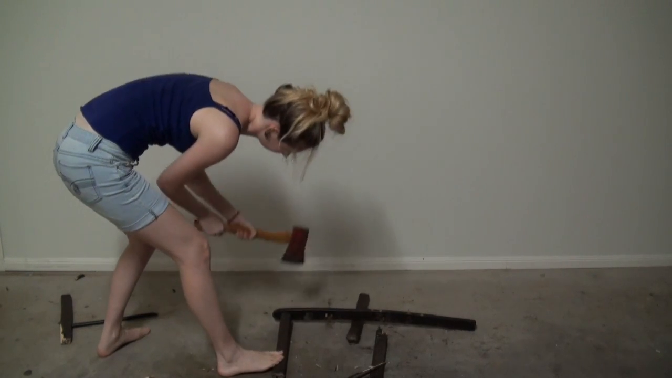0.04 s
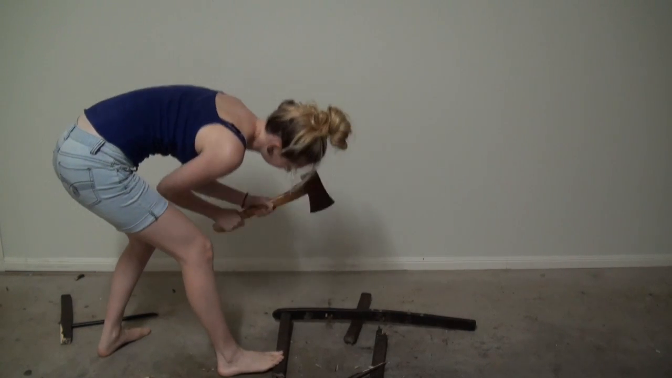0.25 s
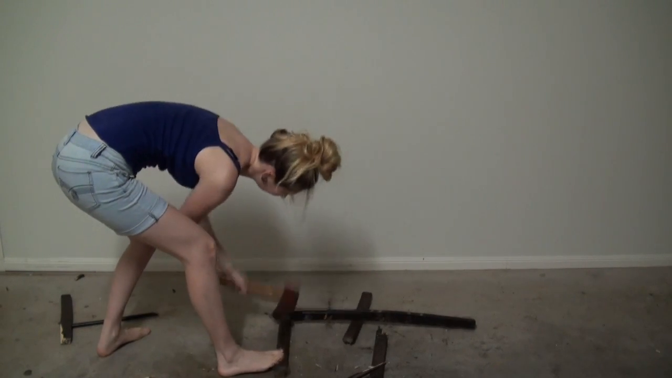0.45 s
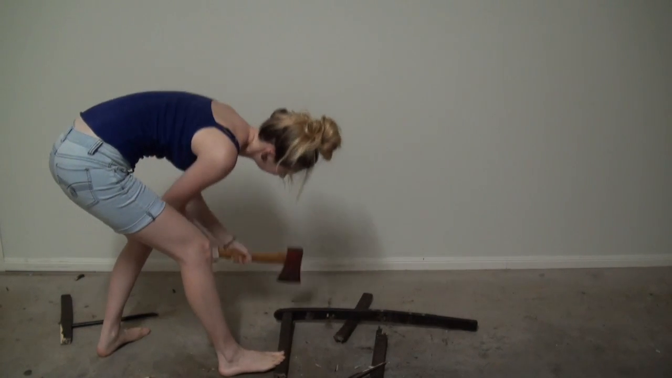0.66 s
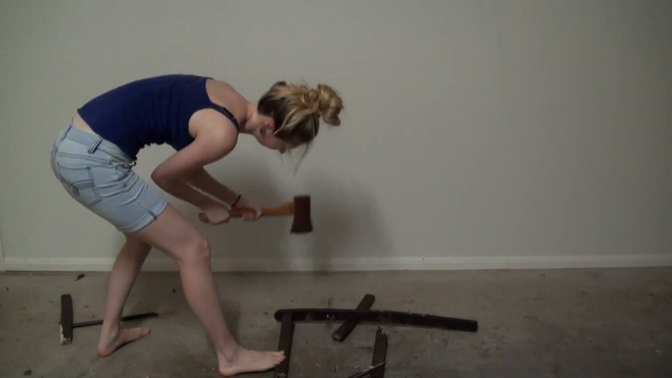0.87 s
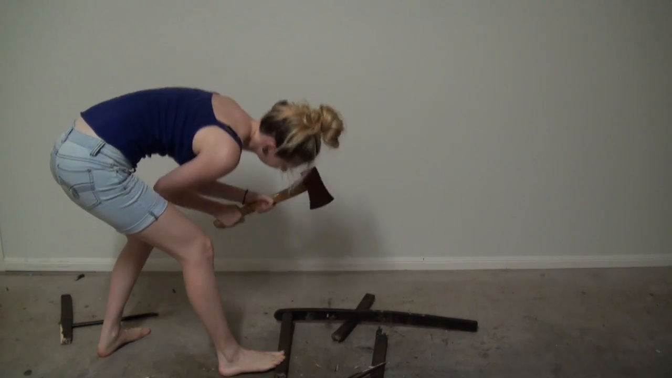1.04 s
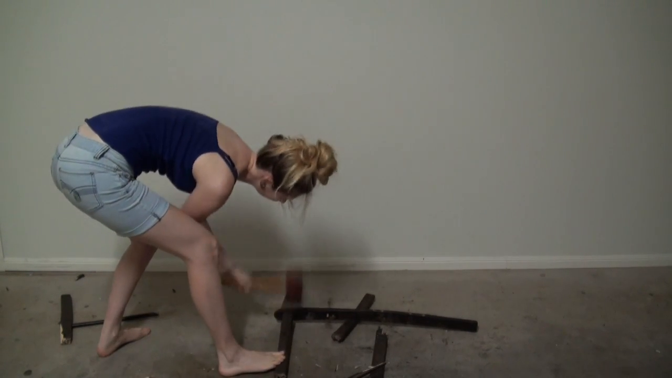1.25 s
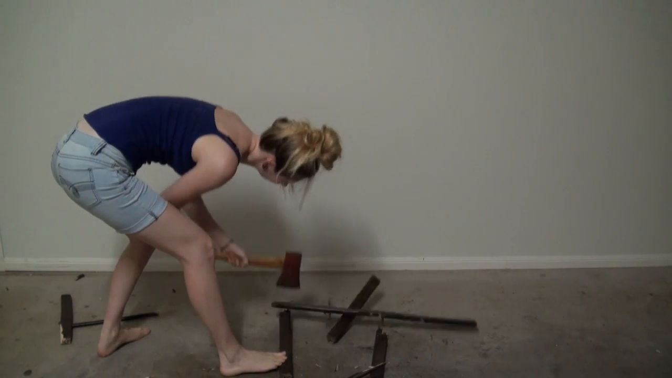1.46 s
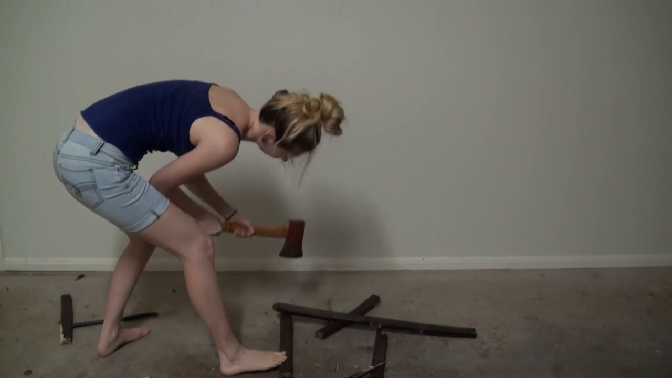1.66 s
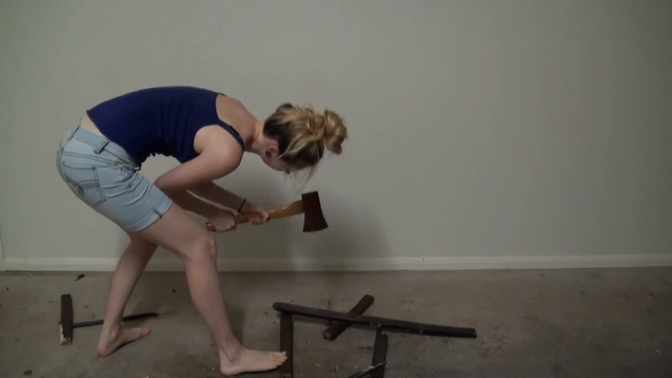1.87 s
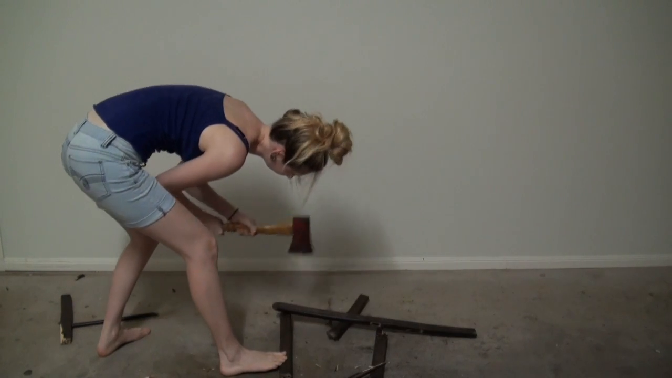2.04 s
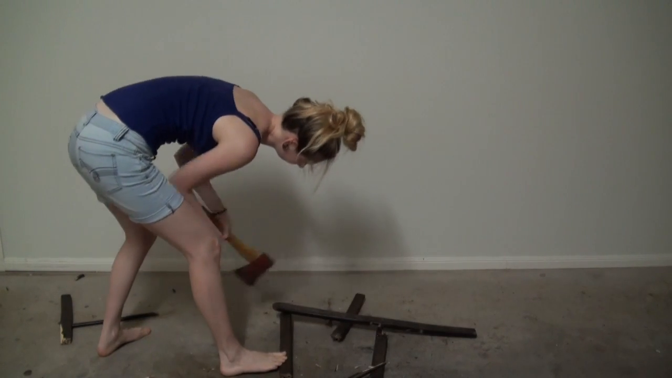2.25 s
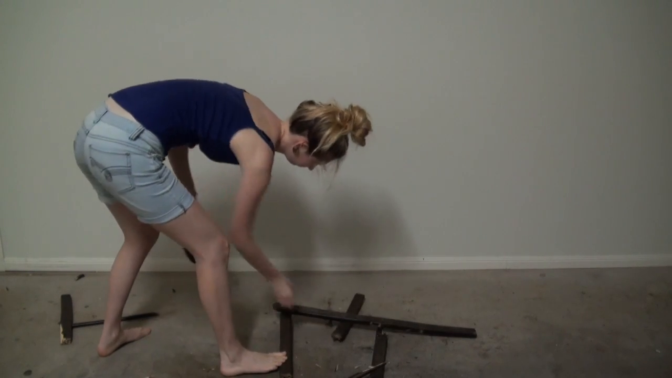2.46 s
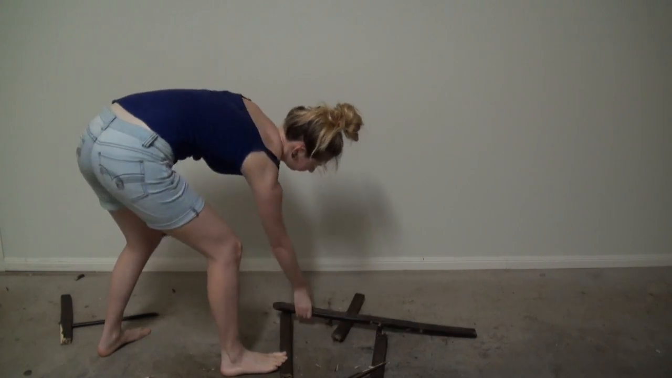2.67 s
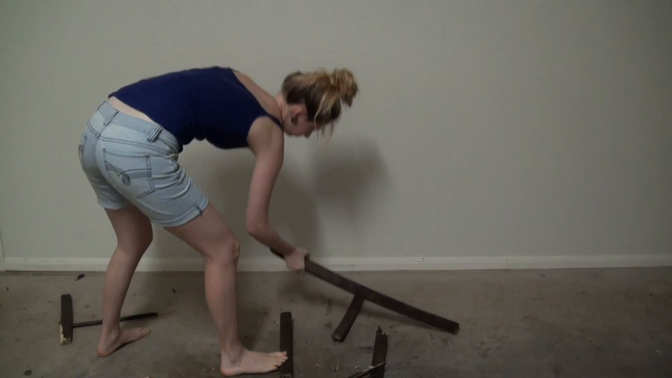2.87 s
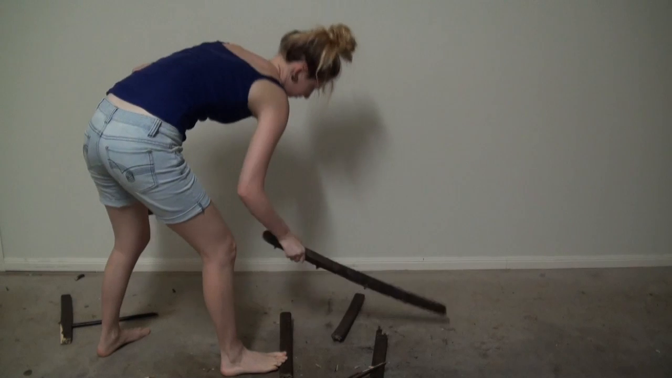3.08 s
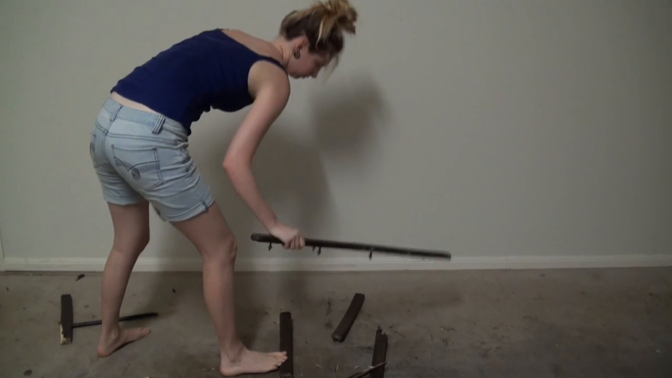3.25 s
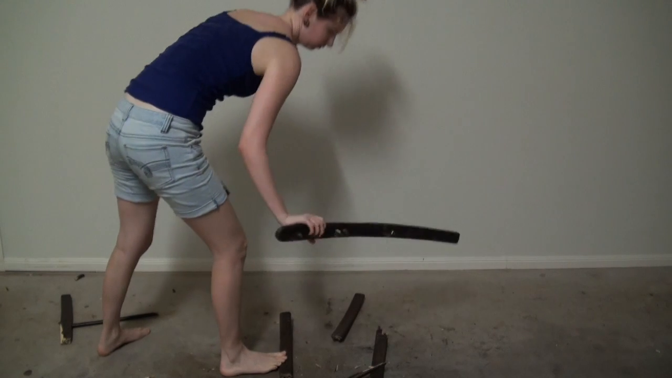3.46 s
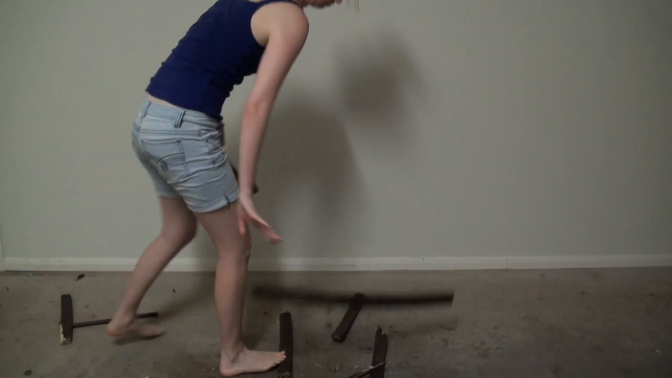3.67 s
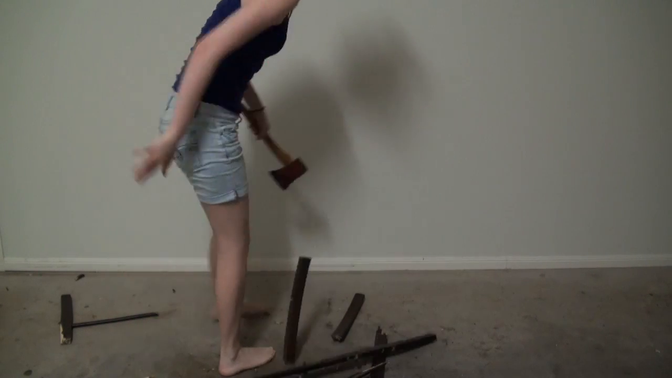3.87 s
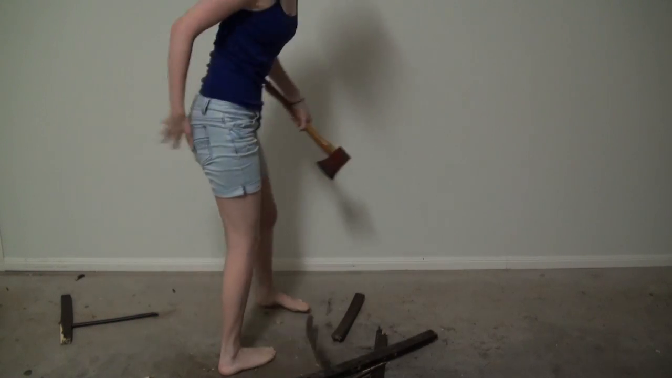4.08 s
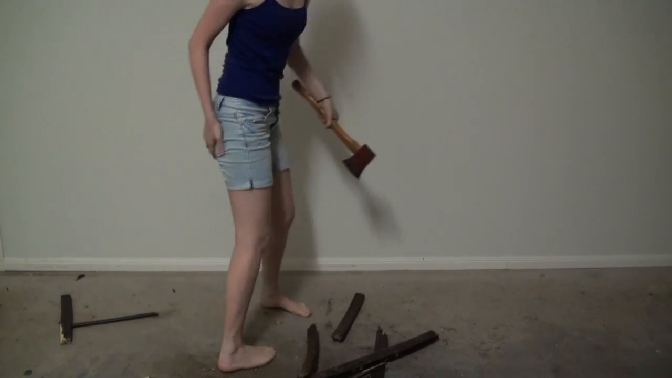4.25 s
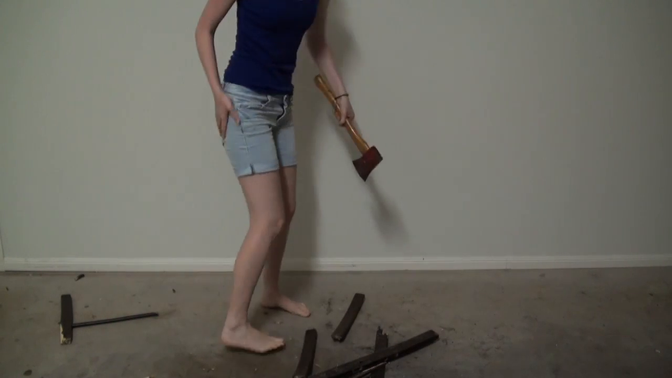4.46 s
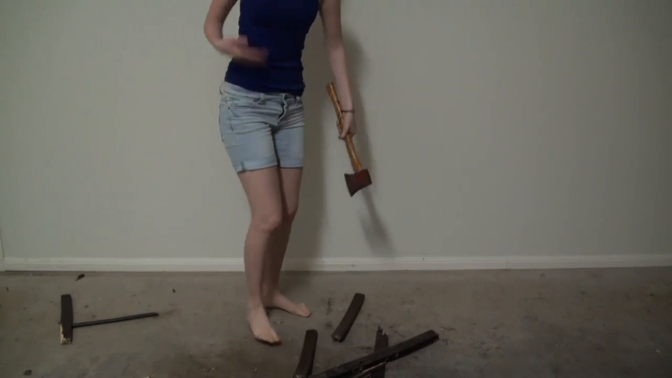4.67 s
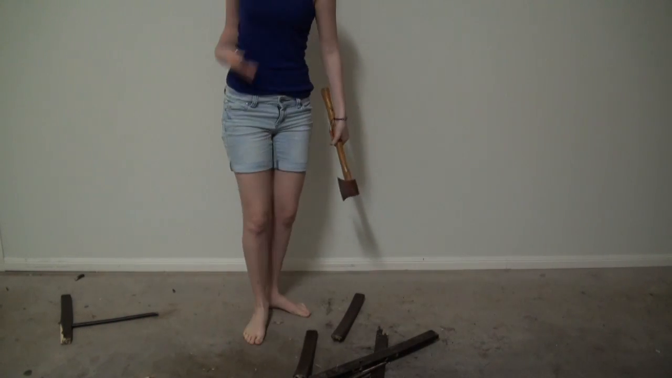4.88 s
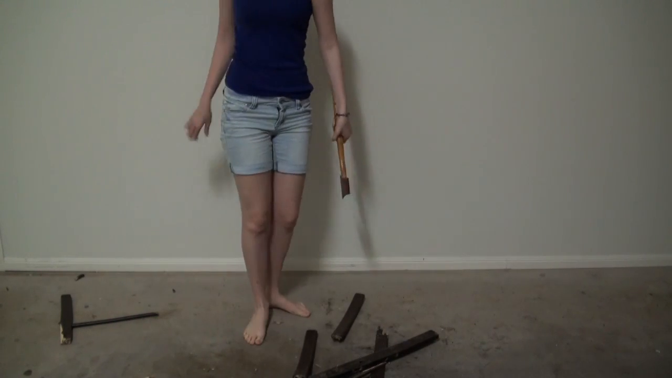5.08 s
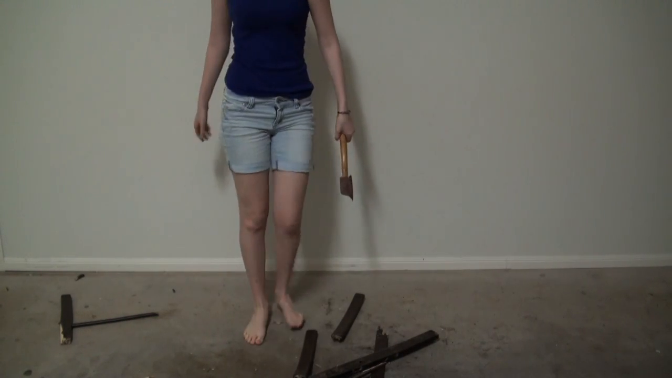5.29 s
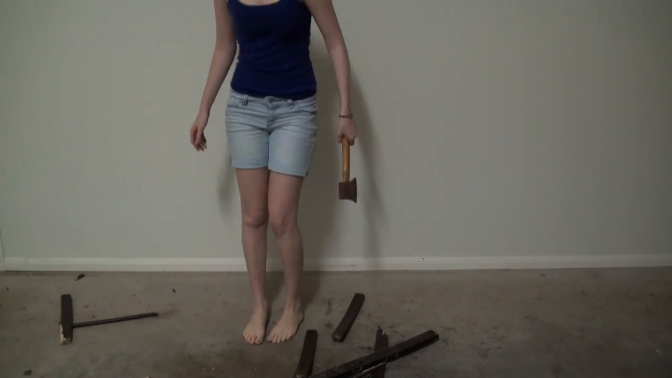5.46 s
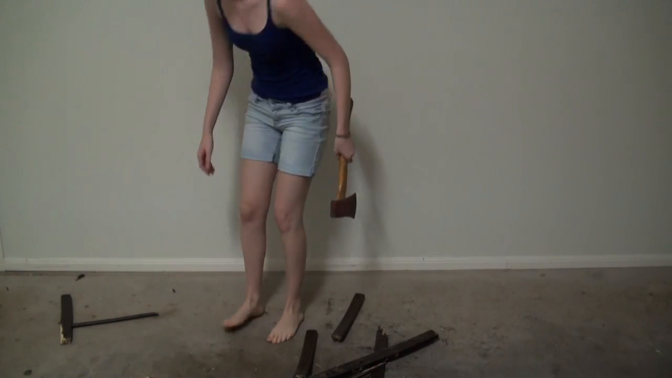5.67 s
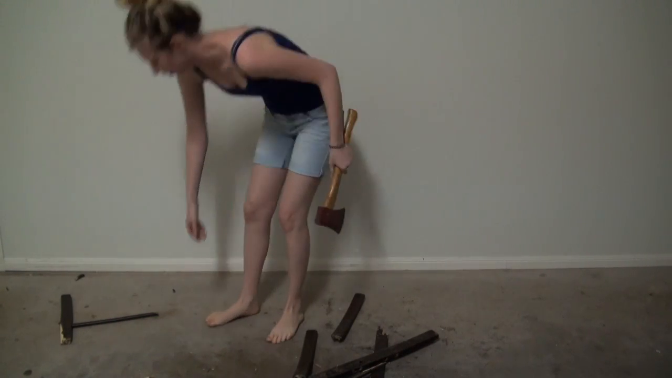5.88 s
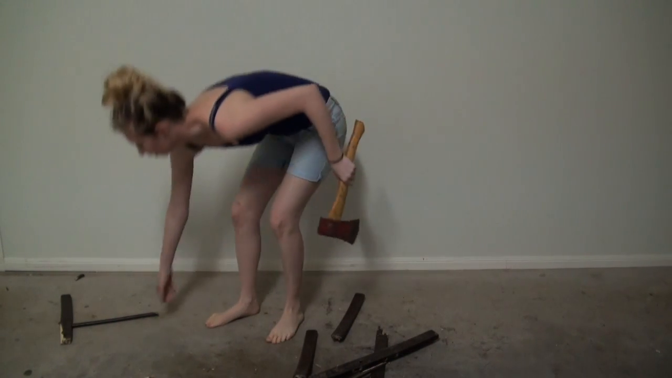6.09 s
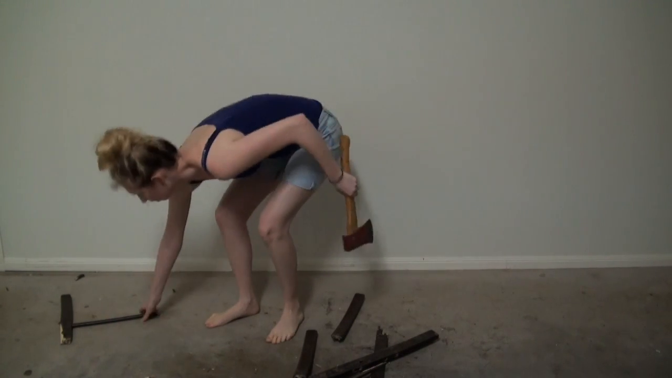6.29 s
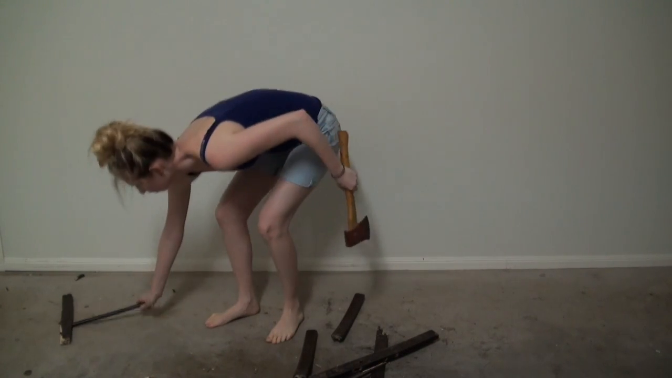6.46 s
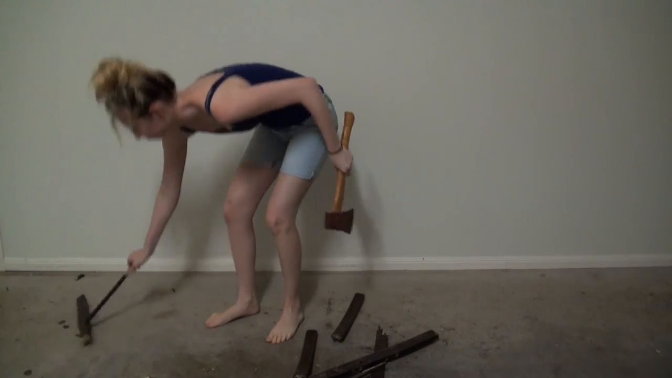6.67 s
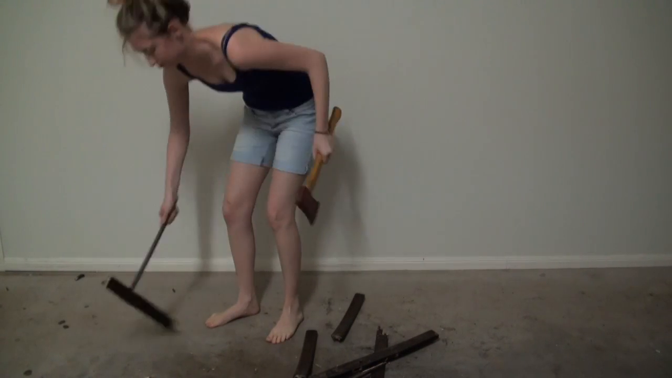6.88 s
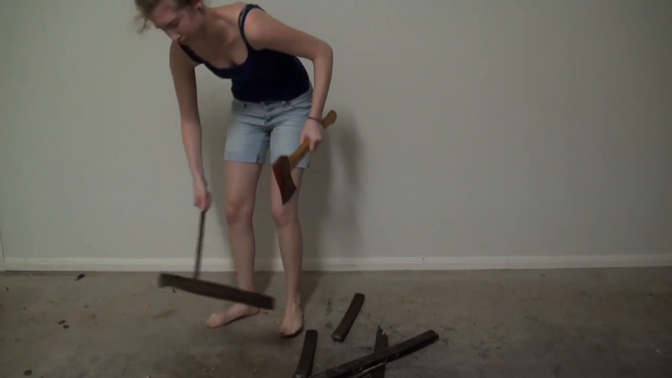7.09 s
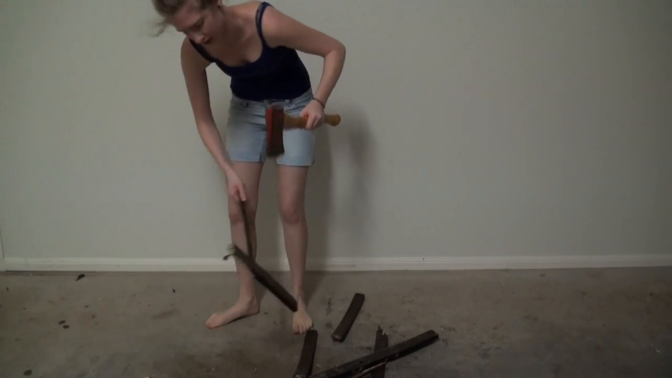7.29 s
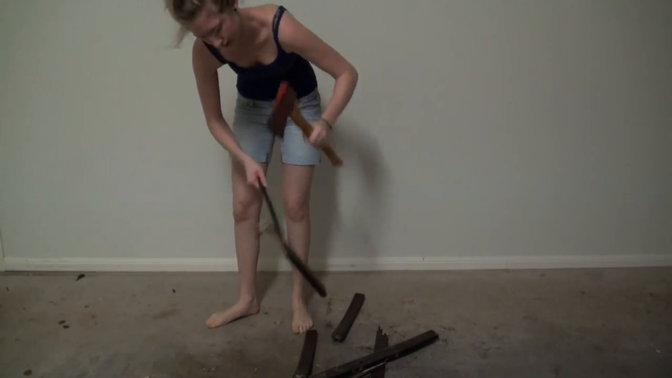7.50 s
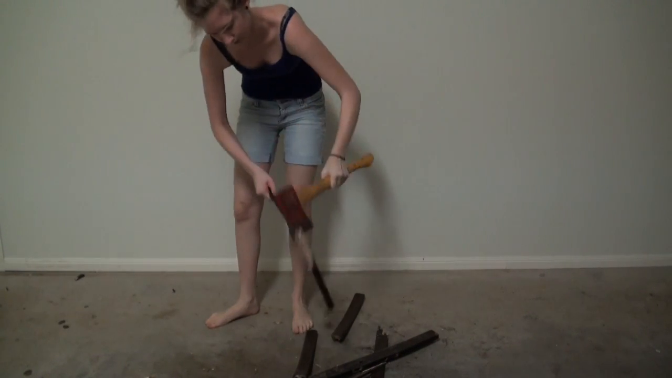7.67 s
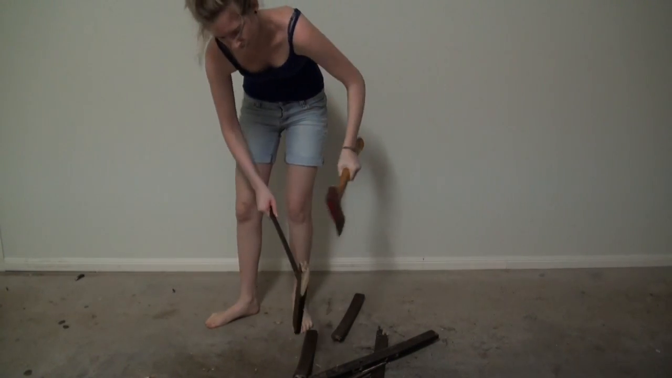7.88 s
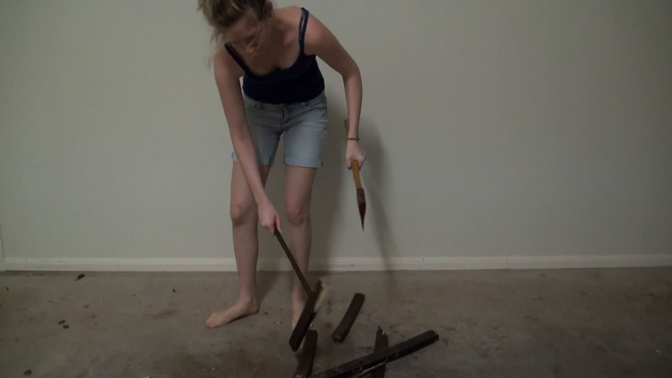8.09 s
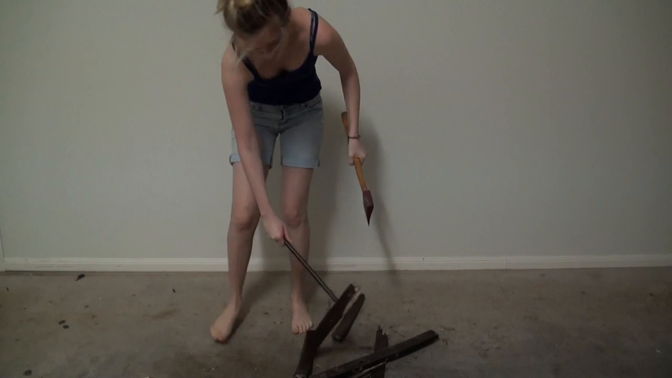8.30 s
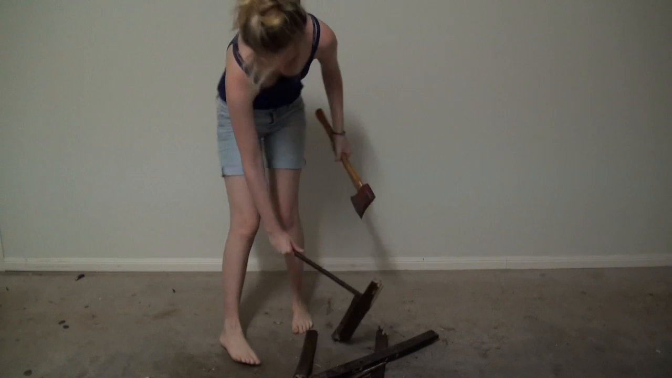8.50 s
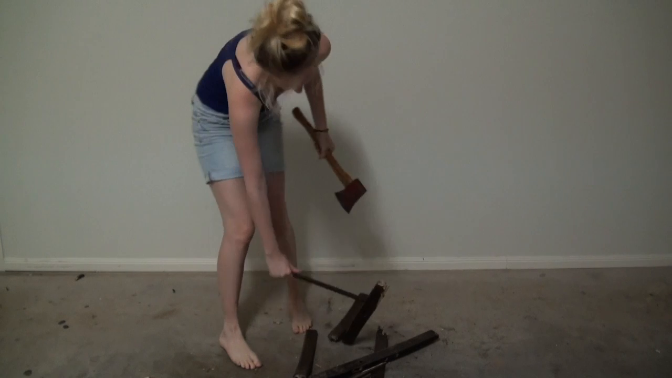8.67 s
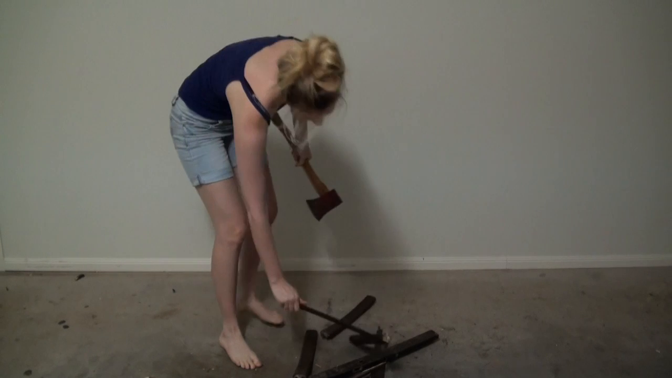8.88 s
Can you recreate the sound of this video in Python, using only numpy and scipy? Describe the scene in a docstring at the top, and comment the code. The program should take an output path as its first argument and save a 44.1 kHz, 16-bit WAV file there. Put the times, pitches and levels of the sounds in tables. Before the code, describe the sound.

Two loud echoing hatchet chops split wooden chair parts, then a thrown rail clatters on concrete, followed by dragging, one weaker chop and dull knocks.

```python
"""In a bare, ringing room with a concrete floor, a hatchet chops a wooden chair apart.
A loose rail is picked up and thrown down, clatters and rocks to rest; a leg is dragged up, struck and set down.
Blows are noise bursts ringing tuned wood with a room echo, over low thuds; drags and brushes are uneven noise.
Grit ticks underfoot; faint hiss and a deep rumble of filtered noise rise and sink together.
A compressor squashes each blow, and its gain recovers through the echo."""
import sys
import numpy as np
from scipy import signal
from scipy.fft import rfft, irfft
from scipy.io import wavfile
from scipy.ndimage import uniform_filter1d

SR = 44100
rng = np.random.default_rng(int(sys.argv[2]) if len(sys.argv) > 2 else 0)


def to_wav(sig):
    """Store sig (one row per channel, or 1-D mono) as 16-bit WAV at the path in sys.argv[1].

    Samples outside -1..1 are clipped; the rate is SR.
    """
    pcm = np.clip(np.atleast_2d(sig), -1, 1) * 32767
    pcm = np.round(pcm).astype(np.int16)
    wavfile.write(sys.argv[1], SR, pcm.T)  # frames by channels


N = 394254

# chops into the frame and into the loose leg: (time [s], bite level [dB], bite brightness [dB per octave],
# bite mode [Hz], split level [dB], lift of the split's mode [dB], freedom to ring [0-2], weight on the floor [dB])
FRAME_CHOPS = [(-.2, 7.5, 0.2, 1665, 5.5, 10, .15, -15), (.557, -3, 1.63, 1097, 7, 7, 0.54, -11),
               (1.371, 0, -0.84, 1464, 2.5, 4, 0.82, -8.5)]
LEG_CHOPS = [(7.686, -10.5, 0.0054, 1340, -6.5, 12, 0.14, -26)]
# the thrown rail hits the floor: (time [s], level [dB], brightness [dB per octave], favoured mode [Hz],
# its lift [dB], weight on the floor [dB])
LANDINGS = [(3.831, -9, 2, 1175, 16, -19.5), (3.861, -8.5, -2, 1427, -3.5, -26),
            (3.871, -4.5, 5.5, 4830, 11.5, -29), (3.907, -2.5, 0.9, 1950, 6, -37.5),
            (4.067, -6, .6, 3400, 3, -45), (4.251, 1, 0.35, 2522, 13, -24)]
# blunt knocks as the leg is set down: (time [s], level [dB], favoured mode [Hz], its lift [dB],
# weight on the floor [dB])
SET_DOWNS = [(8.395, -37.5, 685, 13, -45), (8.673, -36, 1300, -8, -39), (8.722, -27.5, 1350, 3, -15)]
# colour of the leg: (frequency [Hz], relative level [dB])
LEG_COLOUR = [(40, -24), (150, -16.5), (300, -5.5), (480, -2), (800, -5.5), (1500, 0), (2800, -3),
              (4500, -6.5), (6500, -12), (8700, -24), (13000, -18.5), (16000, -28)]
# resonances of the leg, and of the room: (frequency [Hz], width [Hz], lift [dB])
LEG_MODES = [(594, 100, 5.6), (1423, 85, 7.7), (2592, 150, 8.9), (3740, 330, 4.9), (5280, 130, 7.2),
             (7950, 200, 1.1)]
ROOM_MODES = [(157.7, 6.9, 14.1), (270, 13, 5.5), (384, 8.3, 4.6), (403, 30, 0.76), (6100, 610, 5),
              (7840, 570, 7.3), (9530, 200, 7.3), (11500, 510, 2.9)]
# colour of grit and rubbed surfaces: (frequency [Hz], relative level [dB])
SAND_COLOUR = [(100, -18), (600, 0), (2000, 5), (5000, -2.5), (9000, -6.5), (16000, -14.5)]


def amp(db):
    """Decibels to an amplitude factor."""
    return 10 ** (np.asarray(db) / 20)


def unit(x):
    """Scale a signal to an RMS of 1."""
    return x / np.sqrt(np.mean(x ** 2) + 1e-20)


def along(points, hz):
    """Read (frequency, value) points on a log frequency axis."""
    f, v = np.transpose(points)
    return np.interp(np.log(hz + 1), np.log(f), v)


def curve(rows):
    """Join (time, value) rows into one value per sample."""
    return np.interp(np.arange(N) / SR, *np.transpose(rows))


def add(track, s, sound):
    """Mix a sound into the track from s seconds; a negative start leaves only its later part."""
    start = round(s * SR)
    part = sound[max(-start, 0):N - start]
    track[max(start, 0):][:len(part)] += part


def body(colour, modes=(), bright=0, ripple_db=0, size=4096):
    """Causal impulse response of energy 1: a tilted colour, its resonances, and a ripple of many minor modes."""
    hz = np.fft.rfftfreq(size, 1 / SR)
    db = along(colour, hz) + bright * np.log2(np.maximum(hz, 300))
    ripple = unit(uniform_filter1d(rng.standard_normal(len(hz)), size=6))
    db = db + ripple_db * ripple
    for centre, width, lift in modes:
        db = db + lift / (1 + (2 * (hz - centre) / width) ** 2)
    # fold the cepstrum forward in time: minimum phase, so the attack comes first
    cepstrum = irfft(np.log(amp(db)))
    cepstrum[1:size // 2] *= 2
    cepstrum[size // 2 + 1:] = 0
    response = irfft(np.exp(rfft(cepstrum)))
    return response / np.linalg.norm(response)


def echo(build_s=0.0097):
    """A fresh room tail: reflections pile up, then the air makes the treble die first."""
    # decay time of the room: (frequency [Hz], time to fall 60 dB [s])
    room_t60 = [(100, .9), (400, 1.15), (1200, 1.28), (2700, 1.24), (4500, 1.05), (7500, .88), (11000, .66),
                (16000, .45)]
    noise = rng.standard_normal(round(1.7 * SR))
    hz, t, z = signal.stft(noise, SR, nperseg=256)
    decay = amp(-60 * t / along(room_t60, hz)[:, None])
    build = 1 - np.exp(-t / build_s)
    return signal.istft(z * decay * build, SR, nperseg=256)[1]


def strike(response, crack_t60, room_db, snap_db, direct_db=4):
    """A short crunch of contact and its echo ring the struck body; the bare snap of fibres arrives directly."""
    tail = echo()
    t = np.arange(len(tail)) / SR
    crack = rng.standard_normal(len(t)) * amp(-60 * t / crack_t60)
    excitation = amp(direct_db) * crack + amp(room_db) * tail
    rung = signal.fftconvolve(excitation, response)
    return rung[:len(t)] + amp(snap_db) * crack


def wood(hits, colour, modes, favour_width, crack_t60, room_db, snap_db, ripple_db):
    """Blows on one piece: a pinned piece rings less, and the point of contact favours one mode."""
    track = np.zeros(N)
    for s, db, bright, hz, lift_db, freedom in hits:
        ringing = [(centre, width, freedom * lift) for centre, width, lift in modes]
        favoured = [(hz, favour_width * hz, lift_db)]
        response = body(colour, ringing + ROOM_MODES + favoured, bright, ripple_db)
        # harder, brighter contacts snap more
        blow = strike(response, crack_t60, room_db, snap_db + 0.93 * bright)
        add(track, s, amp(db) * blow)
    return track


def chop(rows, split_s, split_hz, split_bright):
    """Two contacts per chop: the edge bites, and a moment later the wood splits with a brighter sound."""
    bite_lift_db = 8.5  # how much the edge favours its mode
    hits = []
    for s, bite_db, bright, bite_hz, split_db, lift_db, freedom, _ in rows:
        hits.append((s, bite_db, bright, bite_hz, bite_lift_db, freedom))
        hits.append((s + split_s, split_db, bright + split_bright, split_hz, lift_db, freedom))
    return hits


def clatter(bright, count):
    """The rail lands end over end, then rocks to rest on one mode, each bounce sooner and weaker."""
    landing_freedom, rock_freedom = 0.9, 1.1
    rock_db, rock_loss_db = -9, 23  # first bounce, and loss per bounce
    rock_hz, rock_lift_db = 2533, 18
    flight_s, shrink = 0.21, 0.63  # first flight, and the factor for each next one
    hits = []
    for s, db, tilt, hz, lift_db, _ in LANDINGS:
        hits.append((s, db, tilt, hz, lift_db, landing_freedom))
    s = 4.31
    for k in range(count):
        hits.append((s, rock_db - k * rock_loss_db, bright, rock_hz, rock_lift_db, rock_freedom))
        s += flight_s * shrink ** k
    return hits


def taps(rows, lift_db, rebound_s, rebound_db):
    """Light contacts on a loose piece; each chatters once more, a little weaker."""
    hits = []
    for s, db, bright, hz, freedom in rows:
        hits.append((s, db, bright, hz, lift_db, freedom))
        hits.append((s + rebound_s, db + rebound_db, bright, hz, lift_db, freedom))
    return hits


def set_down(bright, freedom):
    """Dull knocks of the leg, damped by the hand that holds it."""
    return [(s, db, bright, hz, lift_db, freedom) for s, db, hz, lift_db, _ in SET_DOWNS]


def frame_and_rail():
    """The frame's modes ring under the hatchet, in the loose rail, and in one flying splinter."""
    # colour of the frame: (frequency [Hz], relative level [dB])
    frame_colour = [(40, -39.5), (110, -33.5), (152, -22), (200, -30), (300, -21), (600, -8.5),
                    (1000, -6.5), (1700, 2.5), (2800, -2.5), (4500, -5), (6000, -14), (8500, -25.5),
                    (12000, -26.5), (16000, -36.5)]
    # resonances of the frame: (frequency [Hz], width [Hz], lift at freedom 1 [dB])
    frame_modes = [(634, 100, 10), (930, 120, 8.5), (1204.4, 45, 12.5), (1386, 88, 7.5), (1820, 72, 10.5),
                   (2403, 160, 11), (2910, 270, 11), (3447, 100, 8), (4430, 440, 4), (4320, 95, 1),
                   (4900, 110, 1)]
    # taps as the rail is jogged or lifted: (time [s], level [dB], brightness [dB per octave],
    # favoured mode [Hz], freedom to ring [0-2])
    rail_taps = [(2.72, -50.5, 1.5, 3600, 1.4), (2.783, -44, 1.8, 1910, 1.4), (2.907, -37, 4.5, 2300, 0.94),
                 (3.041, -42, 0.5, 3510, 1.3), (3.407, -59, 6, 6360, 0.39)]
    # a splinter from the third chop lands: (time [s], level [dB], brightness [dB per octave],
    # favoured mode [Hz], its lift [dB], freedom to ring [0-2])
    splinter = [(1.63, -16.5, 1.5, 4330, 8, 1.8)]
    hits = (chop(FRAME_CHOPS, split_s=.008, split_hz=3005, split_bright=0.21)
            + taps(rail_taps, lift_db=6.5, rebound_s=0.027, rebound_db=-5)
            + clatter(bright=1.2, count=3) + splinter)
    return wood(hits, frame_colour, frame_modes, favour_width=0.12,
                crack_t60=0.044, room_db=-3.5, snap_db=-23, ripple_db=2.5)


def loose_leg():
    """The leg rings in its own modes as it is jogged, struck and set down."""
    # taps as the leg is jogged or lifted: (time [s], level [dB], brightness [dB per octave],
    # favoured mode [Hz], freedom to ring [0-2])
    leg_taps = [(6.3, -48.5, 1.6, 2800, 0.94), (6.427, -38.5, 2.2, 3800, 0.97),
                (6.534, -32.5, 5.4, 3780, 1.7), (6.636, -28, 3.6, 5200, 1.8), (6.668, -27.5, 1.3, 4040, 2),
                (6.748, -18.5, 0.58, 2610, 1.94), (8.796, -28.5, 5.2, 2770, 1.74)]
    hits = (chop(LEG_CHOPS, split_s=.0035, split_hz=2600, split_bright=0.96)
            + taps(leg_taps, lift_db=8.5, rebound_s=.033, rebound_db=-9.0)
            + set_down(bright=-3.5, freedom=0.42))
    return wood(hits, LEG_COLOUR, LEG_MODES, favour_width=0.16,
                crack_t60=0.047, room_db=-2.5, snap_db=-44, ripple_db=2.5)


def thud(hz, t60):
    """One low sine that starts at once and dies away."""
    t = np.arange(SR) / SR
    return np.sin(2 * np.pi * hz * t) * amp(-60 * t / t60)


def bumps(events, bright, boom_db, push_db, room_db):
    """The weight of each blow on the floor: a soft push, its echo, and a boom near the room's lowest mode."""
    # colour of the push: (frequency [Hz], relative level [dB])
    bump_colour = [(40, -40), (130, -15), (280, -4), (520, -5), (800, -12), (1500, -40), (5000, -55.5),
                   (16000, -58)]
    track = np.zeros(N)
    for s, *_, weight_db in events:
        contact = amp(room_db) * echo()
        contact[0] += amp(push_db)
        push = signal.fftconvolve(contact, body(bump_colour, ROOM_MODES, bright))
        add(track, s, amp(weight_db) * push)
        add(track, s, amp(weight_db + boom_db) * thud(hz=155, t60=0.33))
    return track


def floor_weight():
    """Chops, landings and knocks press on the concrete, each kind with its own balance of push and boom."""
    return (bumps(FRAME_CHOPS + LEG_CHOPS, bright=0.77, boom_db=-5, push_db=22.5, room_db=-13)
            + bumps(LANDINGS, bright=-1, boom_db=-9, push_db=20, room_db=-9)
            + bumps(SET_DOWNS, bright=1, boom_db=-13.5, push_db=24.5, room_db=-9.5))


def low_thumps():
    """Brief low thumps at 45 Hz are heard with the heaviest contacts."""
    # (time [s], level [dB])
    thumps = [(.559, -15), (.635, -18), (1.373, -24), (3.862, -23), (4.251, -23)]
    track = np.zeros(N)
    for s, db in thumps:
        add(track, s, amp(db) * thud(hz=45, t60=0.099))
    return track


def strokes(rows, attack_s, release_s):
    """Force of rubbing strokes: each swells up to its start, holds, and dies away after its length."""
    t = np.arange(N) / SR
    force = np.zeros(N)
    for s, length, db in rows:
        before = np.maximum(s - t, 0) / attack_s
        after = np.maximum(t - s - length, 0) / release_s
        force += amp(db - 20 * (before + after))  # 20 dB per attack or release time
    return force


def rub(force, response, grain_db, direct_db):
    """Friction: uneven tiny slips excite a body and fill the room."""
    # each slip lasts 128 samples, about 3 ms
    slips = np.repeat(np.minimum(rng.standard_normal(N // 128 + 1), 1.8), 128)[:N]
    friction = unit(rng.standard_normal(N) * amp(grain_db * slips)) * force
    path = echo()
    path /= np.linalg.norm(path)
    path[0] += amp(direct_db)
    return signal.fftconvolve(friction, signal.fftconvolve(path, response))[:N]


def drag(leg_db=-1, sand_db=-6):
    """The leg dragged over concrete hums in its own modes while the grit under it hisses."""
    # (start of full force [s], length [s], force [dB])
    drag_strokes = [(6.6, 0.16, -32.5), (6.99, 0.22, -37)]
    force = strokes(drag_strokes, attack_s=0.14, release_s=0.2)
    leg_body = body(LEG_COLOUR, LEG_MODES[:4] + ROOM_MODES, bright=0.2, ripple_db=1.5)
    ringing = rub(force, leg_body, grain_db=7.5, direct_db=-4.5)
    hiss = rub(force, body(SAND_COLOUR, ROOM_MODES, bright=1.8), grain_db=10, direct_db=-4)
    return amp(leg_db) * ringing + amp(sand_db) * hiss


def grit():
    """Grit and splinters under bare feet: small dry ticks of noise."""
    # (time [s], level [dB], brightness [dB per octave])
    ticks = [(5.22, -56, 6), (5.288, -56.5, 8), (5.574, -50, 6), (5.919, -49, 15), (5.969, -44.5, -0.5),
             (8.21, -43, 5), (8.32, -45, 8), (8.565, -48, 9)]
    track = np.zeros(N)
    for s, db, bright in ticks:
        response = body(SAND_COLOUR, bright=bright)
        tick = strike(response, crack_t60=0.041, room_db=-6, snap_db=-15, direct_db=5)
        add(track, s, amp(db) * tick)
    return track


def rustle():
    """Clothes, hands and soles brush past as soft, grainy friction."""
    # (start of full force [s], length [s], force [dB])
    brushes = [(2.8, .26, -51), (3.56, 0.015, -53), (3.8, .02, -51.5), (5.64, 0.027, -56),
               (6.05, 0.32, -63.5), (7.8, 1.1, -58)]
    force = strokes(brushes, attack_s=0.2, release_s=0.082)
    response = body(SAND_COLOUR, bright=0.85, ripple_db=3.0)
    return rub(force, response, grain_db=11.5, direct_db=-1.5)


def coloured_noise(colour):
    """Steady noise of one colour, with the filter's onset cut away."""
    return signal.fftconvolve(rng.standard_normal(N + SR), body(colour))[SR:SR + N]


def background(hiss_db=-59.0, side_db=-7, hiss_share=.35):
    """Faint hiss and deep rumble rise and sink together, the hiss less; only the rumble differs in stereo."""
    # level of the rumble's middle: (time [s], level [dB])
    rumble_level = [(0, -59), (2.3, -64.5), (3.4, -53), (4.8, -58), (6, -53), (7.2, -49), (8.94, -49.5)]
    # colours of hiss and rumble: (frequency [Hz], relative level [dB])
    hiss_colour = [(20, -8), (100, -14.5), (200, -7.5), (500, -13), (1500, -21), (4000, -23), (9000, -30),
                   (16000, -28)]
    deep_colour = [(20, 7.5), (45, -3), (90, -1.5), (160, -10.5), (400, -17.5), (2000, -56)]
    mid = coloured_noise(deep_colour)
    side = amp(side_db) * coloured_noise(deep_colour)
    level_db = curve(rumble_level)
    hiss_change_db = hiss_share * (level_db - level_db.mean())
    hiss = amp(hiss_db + hiss_change_db) * coloured_noise(hiss_colour)
    return hiss + amp(level_db) * np.array([mid + side, mid - side])


def scene():
    """Frame and rail, the loose leg, their weight on the floor, and the small sounds of moving about."""
    pieces = frame_and_rail() + loose_leg()
    low_end = floor_weight() + low_thumps()
    movement = drag() + grit() + rustle()
    return pieces + low_end + movement + background()


def compress(x, threshold_db=-13, ratio=4, release_db=70, attack_s=.0013):
    """Gain ducks within milliseconds of a loud sound; the held overshoot then falls by release_db a second."""
    # mean power of the last 200 samples; abs guards against rounding below zero
    power = np.abs(uniform_filter1d(x.mean(axis=0) ** 2, size=200, origin=99))
    over = np.maximum(10 * np.log10(power + 1e-12) - threshold_db, 0)
    ramp = release_db * np.arange(N) / SR
    held = np.maximum.accumulate(over + ramp) - ramp
    pole = np.exp(-1 / (attack_s * SR))
    # the gain starts already ducked, at the overshoot held 10 ms in
    smooth = signal.lfilter([1 - pole], [1, -pole], held, zi=[held[SR // 100]])[0]
    return x * amp(-smooth * (1 - 1 / ratio))


def record(dry):
    """Compressor, rounded clipping of what slips through, and a steep band limit."""
    squashed = compress(dry)
    rounded = squashed / (1 + np.abs(squashed / .85) ** 8) ** (1 / 8)
    top_hz = 15900
    band_limit = signal.ellip(10, .2, 80, top_hz, fs=SR, output="sos")
    return signal.sosfilt(band_limit, rounded)


dry = scene()
out = record(dry)
to_wav(out)
```